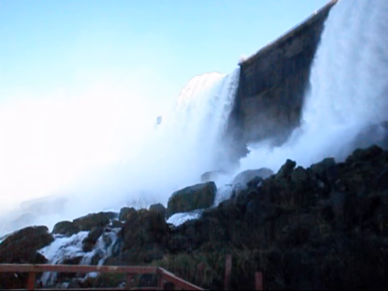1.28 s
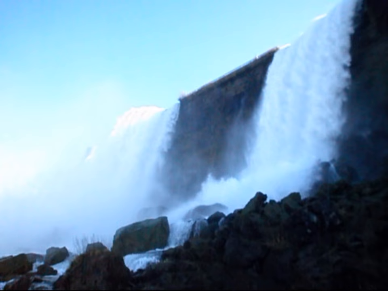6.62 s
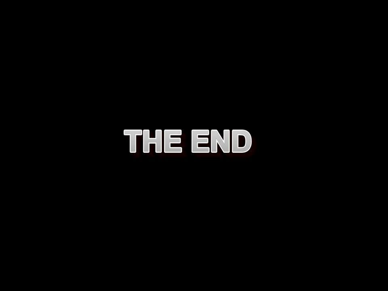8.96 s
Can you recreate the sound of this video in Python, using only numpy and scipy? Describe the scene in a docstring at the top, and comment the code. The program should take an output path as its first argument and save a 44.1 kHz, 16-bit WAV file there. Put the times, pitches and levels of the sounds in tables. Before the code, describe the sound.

Loud, steady roar of a nearby waterfall, white water churning over boulders with a deep rumble and hissing spray.

```python
"""At the foot of a large waterfall, water pours onto boulders close by.
Air driven into the pool throbs, white water roars with bubbles, and shattering drops hiss in surges.
A handheld microphone pans slowly; a very short reflection from the hand shifts the colour of the rush.
One brief peak in the rush clips with a faint tick.
The small recorder samples at 8 kHz, which adds a faint mirrored fizz on top, and stops abruptly."""
import sys
import numpy as np
from scipy import signal
from scipy.fft import rfft, irfft, next_fast_len
from scipy.io import wavfile
from scipy.ndimage import uniform_filter1d, map_coordinates

SR = 44100
rng = np.random.default_rng(int(sys.argv[2]) if len(sys.argv) > 2 else 0)


def wav_out(sig):
    """Save sig, one row per channel (or a flat mono array), as 16-bit PCM at SR to the path in sys.argv[1]."""
    wavfile.write(sys.argv[1], SR, np.round(np.clip(np.atleast_2d(sig).T, -1, 1) * 32767).astype(np.int16))


N = 418950
TIME_S = np.arange(N) / SR
STOP_S = 8.997


def amp(db):
    """Decibels to gain."""
    return 10 ** (np.asarray(db) / 20)


def unit(x):
    """x at rms 1."""
    return x / np.sqrt(np.mean(x ** 2) + 1e-20)


def curve(rows, t_s=TIME_S):
    """(t/s, value) rows, interpolated at t_s."""
    return np.interp(t_s, *np.transpose(rows))


def wobble(knots_per_s):
    """Smooth random curve, rms about 1."""
    knots = rng.standard_normal(int(N * knots_per_s / SR) + 4)
    return map_coordinates(knots, [TIME_S * knots_per_s])


def bell(hz, centre_hz, width_hz):
    """Gaussian bump of height 1."""
    return np.exp(-((hz - centre_hz) / width_hz) ** 2)


def filtered(x, response):
    """x through a complex frequency response."""
    size = next_fast_len(N + 8192)
    return irfft(rfft(x, size) * response(np.fft.rfftfreq(size, 1 / SR)), size)[:N]


def shaped(x, spectrum):
    """x through (f/Hz, level/dB) points on a log frequency axis."""
    points_hz, db = np.transpose(spectrum)
    return filtered(x, lambda hz: amp(np.interp(np.log(hz + 1), np.log(points_hz), db)))


def turbulence(patchy_db):
    """White noise in which patches of about 500 Hz by 60 ms swell and fade."""
    bins = signal.stft(rng.standard_normal(N), nperseg=512)[2]
    patches = uniform_filter1d(rng.standard_normal(bins.shape), size=6, axis=0)
    patches = uniform_filter1d(patches, size=11, axis=1)
    return unit(signal.istft(bins * amp(patchy_db * unit(patches)), nperseg=512)[1][:N])


def bubbles(count, low_hz, high_hz, ring_cycles, spread_db):
    """Bubbles or drops at random times: damped sines, mostly weak, a few strong."""
    onset, pitch, size = rng.random((count, 3)).T[:, :, None]
    age = np.arange(256)
    cycles = (low_hz + (high_hz - low_hz) * pitch) * age / SR
    strength = amp(-spread_db * np.log(np.maximum(size, .005)))
    rings = strength * np.sin(2 * np.pi * cycles) * amp(-60 * cycles / ring_cycles)
    index = (onset * N).astype(int) + age
    return unit(np.bincount(index.ravel(), rings.ravel(), N)[:N])


# Plunge spectrum: f/Hz, level/dB
PLUNGE_SPECTRUM = [(20, -43.5), (48, -28.5), (65, -21.5), (85, -19.5), (130, -10), (185, -2.5), (235, 1),
                   (305, 1), (390, -7.5), (600, -24), (1200, -59.5)]
def plunge():
    """Masses of water drive clouds of air into the pool, which throb deeply and swell at random."""
    swell_db = -0.26 * wobble(1.9)
    throb_db = 0.34 * wobble(7)
    return amp(swell_db + throb_db) * unit(shaped(turbulence(patchy_db=0.27), PLUNGE_SPECTRUM))


# Churn spectrum: f/Hz, level/dB
CHURN_SPECTRUM = [(150, -39.5), (290, -10.5), (400, -2.5), (570, 0), (700, -0.44), (870, -4), (1090, -1.5),
                  (1230, -4), (1500, -7), (1800, -10.5), (2120, -16), (2800, -34), (5000, -67.5)]
def churn():
    """White water boils between the boulders, full of large bubbles."""
    gurgle = bubbles(count=18000, low_hz=816, high_hz=1990, ring_cycles=6, spread_db=2)
    return unit(shaped(turbulence(patchy_db=0.5) + amp(-14) * gurgle, CHURN_SPECTRUM))


# Spray spectrum: f/Hz, level/dB
SPRAY_SPECTRUM = [(1200, -32.5), (2100, -7), (2400, -0.6), (2750, 0), (3020, -0.05), (3250, -3), (3480, -6),
                  (3750, -5.1), (4000, -7.5)]
# Spray surges: t/s, level/dB
SPRAY_SURGES = [(0, 0.8), (0.55, 1.2), (1.4, 0.3), (2.5, -0.8), (3.4, 0.8), (4.5, 0.4), (5.7, 0.2),
                (6.35, 1.5), (7.0, 0.7), (7.6, 0), (8.3, 0.8), (9, 0.5)]
def spray():
    """Drops shatter on the nearer rocks, so densely that they merge into a surging wash."""
    drops = bubbles(count=24000, low_hz=1860, high_hz=3330, ring_cycles=5.9, spread_db=2.9)
    flicker_db = 0.2 * wobble(70)
    wash = unit(shaped(turbulence(patchy_db=0.43) + amp(-15) * drops, SPRAY_SPECTRUM))
    return amp(curve(SPRAY_SURGES) + flicker_db) * wash


# Microphone pan: t/s, turn (-1 facing the fall, +1 aside)
MIC_PAN = [(0.0, -1.1), (1.4, -0.1), (2.5, 0.1), (3.4, 0.8), (4.6, 0.55), (5.5, -0.05), (6.3, -0.8),
           (6.9, -0.9), (7.6, -0.25), (8.3, 0.68), (9.0, 0.3)]
def mic_turn(t_s=TIME_S):
    """Direction of the slowly swinging microphone at t_s."""
    return curve(MIC_PAN, t_s)


def hand_reflection(x, delay_s=.00063, bend_hz=1200, hollow_hz=1760, width_hz=600):
    """An echo off the hand (22 cm detour) combs the rush and one band rings hollow; both follow the pan."""
    # Waves below bend_hz pass round the hand.
    echo = filtered(x, lambda hz: np.exp(-2j * np.pi * hz * delay_s) * hz**4 / (hz**4 + bend_hz**4))
    hollow = filtered(x, lambda hz: 1j * hz * width_hz / (hollow_hz**2 - hz**2 + 1j * hz * width_hz))
    turn = mic_turn()
    return x + (.02 + 0.17 * turn) * echo + 0.2 * turn * hollow


# Narrow ringing band in the roar: t/s, level/dB
RING_LEVEL = [(0, -0.5), (1.1, -2.3), (2.1, -1), (3.2, 0), (4.8, 1), (5.7, -0.5), (6.4, 1), (7.5, -0.3),
              (8.7, -2.5)]
# Upper midrange: t/s, level/dB
MIDRANGE_LEVEL = [(0, -0.3), (0.7, 1.5), (1.6, 1), (2.4, -0.5), (3.6, -0.5), (5.2, 0.35), (6.8, -1.3),
                  (7.7, -0.2), (8.6, 1.1)]
def colour_drift(x, bass_db_per_s=0.4, body_db_per_s=-0.12, notch_db=-1.3):
    """The midrange rings and swells, the weight sinks to the bass, and a notch slides with the pan."""
    hz, t_s, bins = signal.stft(x, SR, nperseg=1024)
    hz = hz[:, None]
    from_middle_s = t_s - STOP_S / 2
    notch_hz = 2100 + 210 * mic_turn(t_s)
    colour_db = (curve(RING_LEVEL, t_s) * bell(hz, 1140, width_hz=150)
                 + curve(MIDRANGE_LEVEL, t_s) * bell(hz, 1330, width_hz=340)
                 + bass_db_per_s * from_middle_s * bell(hz, 150, width_hz=41)
                 + body_db_per_s * from_middle_s * bell(hz, 580, width_hz=230)
                 + notch_db * bell(hz, notch_hz, width_hz=160))
    return signal.istft(bins * amp(colour_db), SR, nperseg=1024)[1][:N]


def brief_peak(x, at_s=.5346, level_db=0.7, pitch_hz=1050):
    """The rush gathers into one brief peak, with no ring."""
    phase = np.pi * pitch_hz * (TIME_S - at_s)
    share = np.exp(-phase ** 2)
    return (1 - share) * x + share * amp(level_db) * (1 - 2 * phase ** 2)


def scene():
    """A steady flow lands in uneven sheets, which lift the spray and, less so, the roar."""
    sheets_db = 0.29 * wobble(7.8) + 0.45 * wobble(28)
    shade_db = -mic_turn()  # turning aside shades the spray, 1 dB per unit of turn
    fall = amp(-23) * plunge()
    fall += amp(-15 + sheets_db / 2) * churn()
    fall += amp(-24 + sheets_db + shade_db) * spray()
    rush = colour_drift(hand_reflection(fall))
    return brief_peak(rush)[None]


# Recorder's playback low-pass: f/Hz, level/dB
PLAYBACK_FILTER = [(2800, 0), (3500, -2), (4000, -5.5), (4500, -10), (5000, -18), (5300, -24.5),
                   (5600, -32), (5900, -43), (6100, -57.5), (6400, -94)]
def record(dry, rate_hz=8000, top_hz=5755, tick_top_hz=13500, clipped_share=.055):
    """The recorder rounds off peaks, samples coarsely and stops."""
    rounded = dry[0] / (1 + (dry[0] / 1.1) ** 8) ** (1 / 8)
    band_limited = filtered(rounded, lambda hz: hz < rate_hz / 2)
    # Sampling mirrors the sound about rate_hz / 2; the gentle low-pass leaks the nearest part.
    mirrored = band_limited * (1 + 2 * np.cos(2 * np.pi * rate_hz * TIME_S))
    played = shaped(mirrored, PLAYBACK_FILTER) * (TIME_S < STOP_S)
    played = signal.sosfilt(signal.butter(16, top_hz, fs=SR, output="sos"), played)
    ceiling = (1 - clipped_share) * np.abs(played).max()  # the highest peak clips with a faint tick
    return filtered(np.clip(played, -ceiling, ceiling), lambda hz: hz < tick_top_hz)[None]


dry = scene()
out = record(dry)
wav_out(out)
```